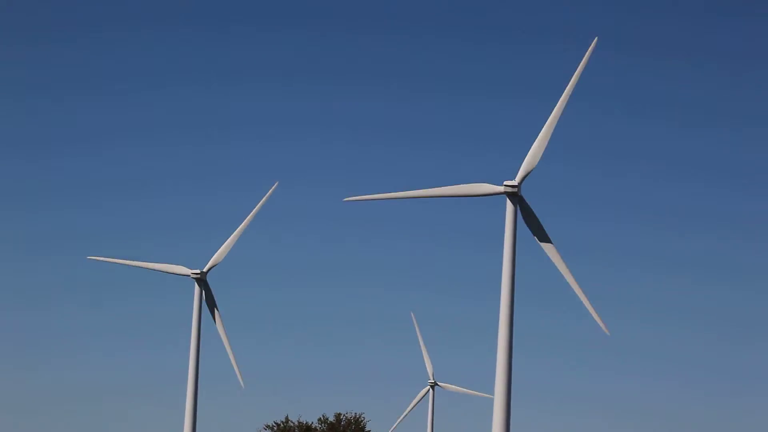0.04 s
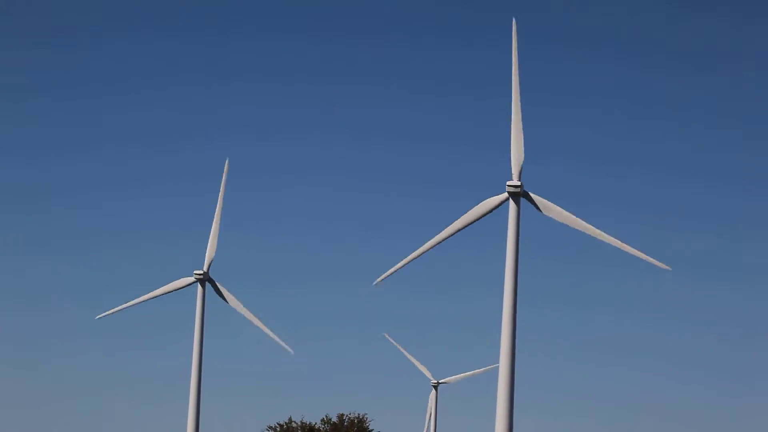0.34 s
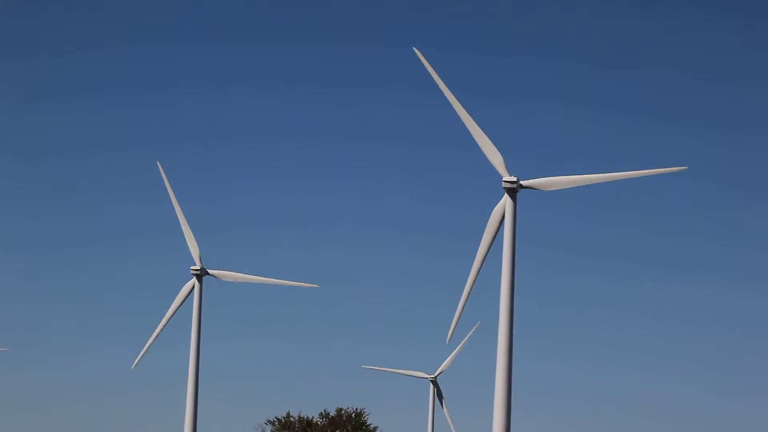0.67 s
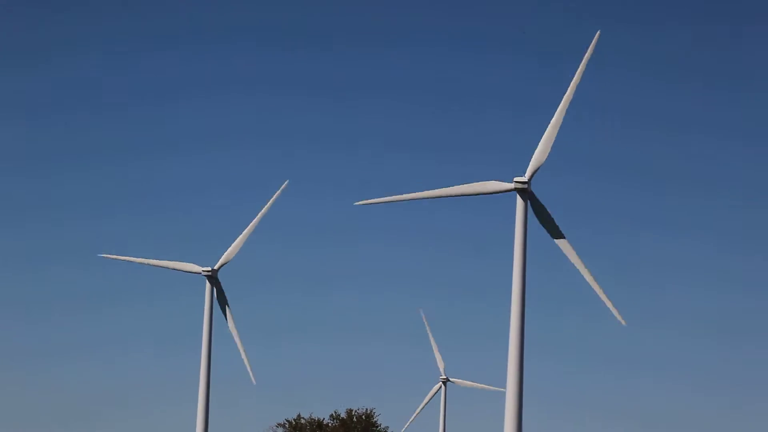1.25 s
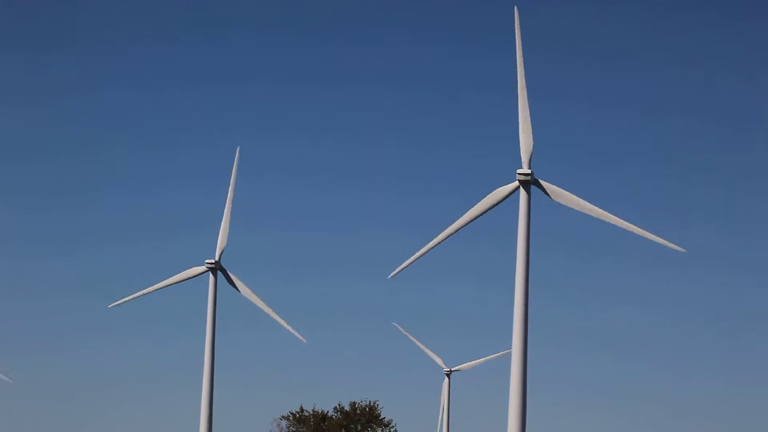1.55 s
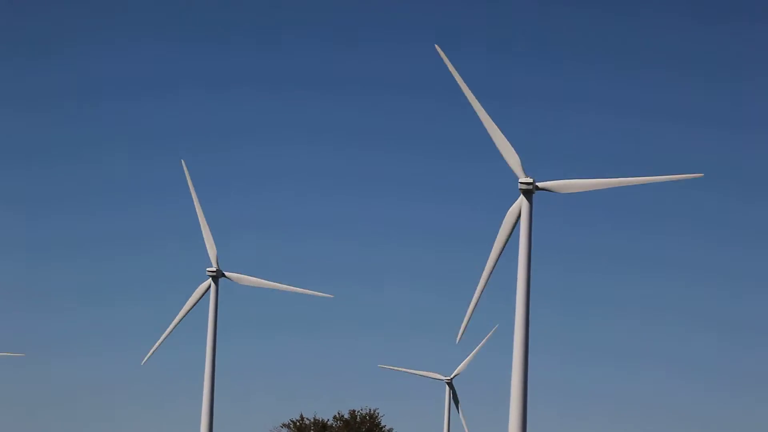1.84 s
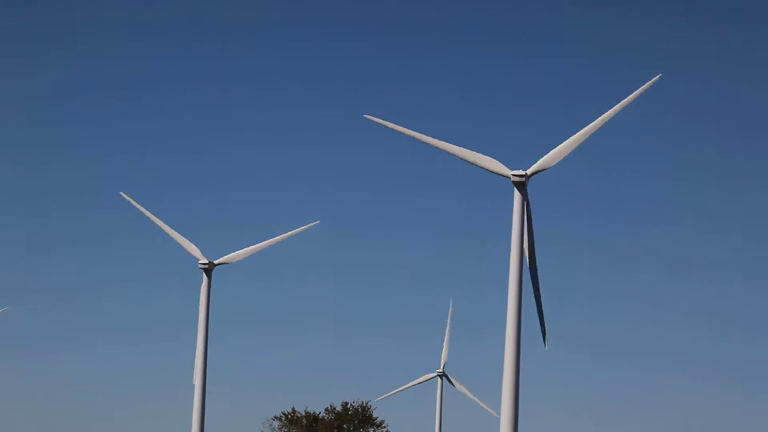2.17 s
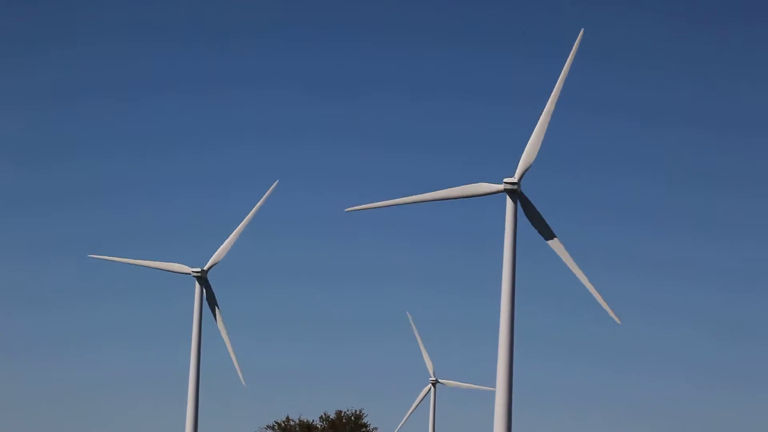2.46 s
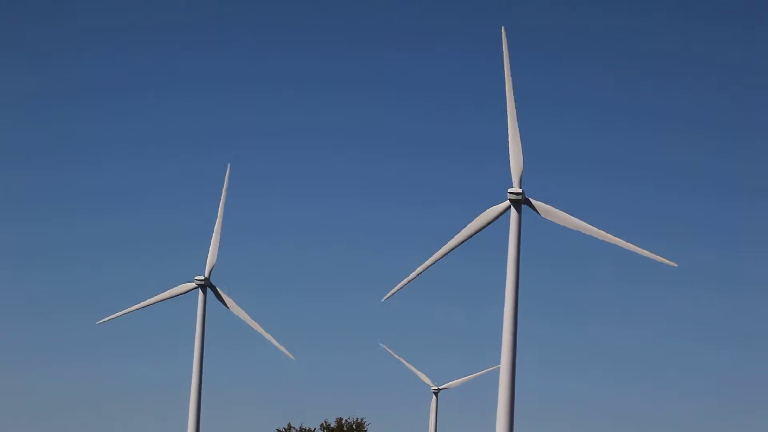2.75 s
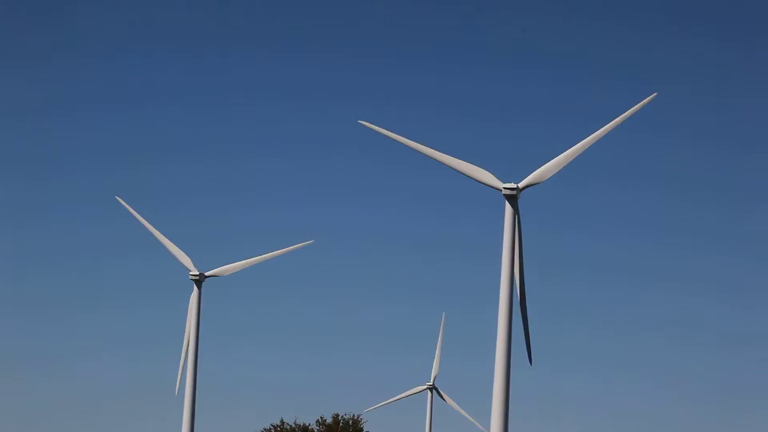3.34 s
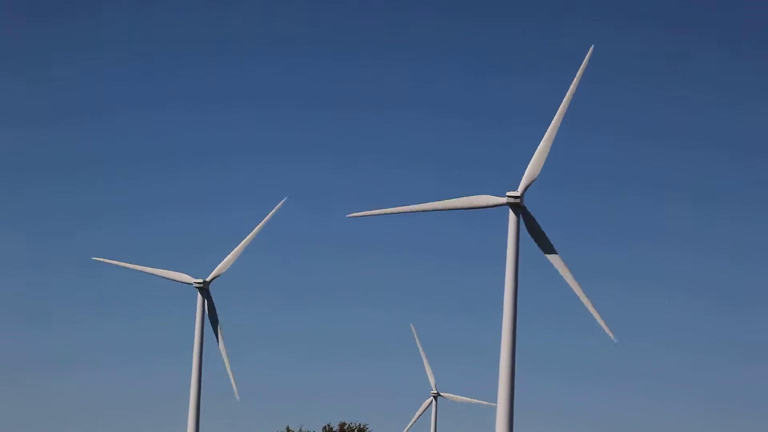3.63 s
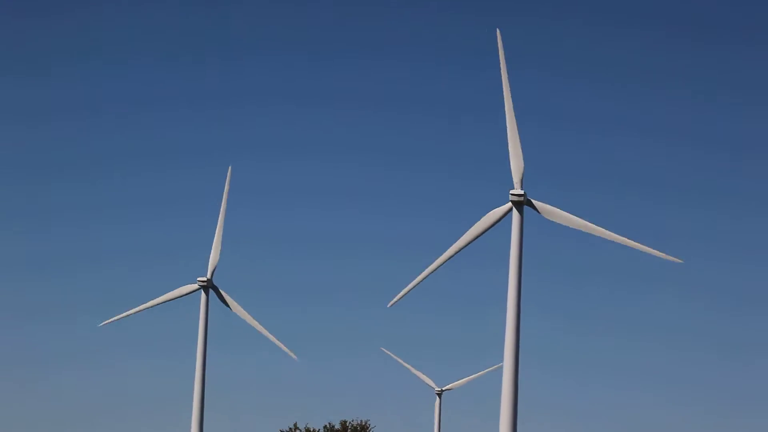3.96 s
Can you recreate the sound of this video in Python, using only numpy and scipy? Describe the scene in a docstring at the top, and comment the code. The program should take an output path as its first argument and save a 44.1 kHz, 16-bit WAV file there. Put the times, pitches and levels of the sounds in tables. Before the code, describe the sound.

Low, uneven wind rumble on a bare microphone, broken by brief knocks and ticks.

```python
"""A field of wind turbines, where gusty wind buffets a bare microphone.
Big eddies rumble and small ones flutter and fizz: bands of pressure noise, each riding its own level.
Low knocks, short pops and dry clicks sound during the gusts, each a single short pulse.
Three faint clanks, like metal some way off, ring over a thin hiss."""
import sys
import numpy as np
from scipy import signal
from scipy.fft import rfft, irfft
from scipy.io import wavfile
from scipy.ndimage import uniform_filter1d

SR = 44100
rng = np.random.default_rng(int(sys.argv[2]) if len(sys.argv) > 2 else 0)


def put_to_file(sound):
    """Save the sound as 16-bit audio at rate SR, in the file named by the first command-line argument."""
    columns = np.atleast_2d(sound).T  # one column per channel
    safe = np.clip(columns, -1, 1)
    whole_steps = np.round(safe * 32767)
    wavfile.write(sys.argv[1], SR, whole_steps.astype(np.int16))


N = 176400
T, HZ = np.arange(N) / SR, np.fft.rfftfreq(N, 1 / SR)


def amp(db):
    """Decibels to gain."""
    return 10 ** (np.asarray(db) / 20)


def unit(x):
    """Scales to rms 1."""
    return x / np.sqrt(np.mean(x ** 2) + 1e-20)


def at_hz(points, hz):
    """Reads a curve on a log-frequency axis."""
    f, value = np.transpose(points)
    return np.interp(np.log(hz + 1), np.log(f + 1), value)


def curve(points):
    """Reads an envelope at every sample."""
    return np.interp(T, *np.transpose(points))


def add(mix, start, sound):
    """Mixes a sound in at start seconds."""
    part = mix[max(round(start * SR), 0):][:len(sound)]
    part += sound[:len(part)]


def noise(spectrum):
    """Noise of the given colour, rms 1."""
    return unit(irfft(rfft(rng.standard_normal(N)) * amp(at_hz(spectrum, HZ)), N))


def even_noise(spectrum, samples):
    """Coloured noise, its power held even over about that many samples."""
    x = noise(spectrum)
    power = uniform_filter1d(uniform_filter1d(x ** 2, samples), samples)
    return x / np.sqrt(abs(power) + 1e-9)


def wander(rate_hz):
    """Smooth random motion up to about rate_hz, rms 1."""
    return unit(irfft(rfft(rng.standard_normal(N)) * np.exp(-(HZ / rate_hz) ** 2), N))


# rumble colour: f/Hz, level/dB
RUMBLE_EQ = [(25, -34.5), (50, -23.5), (65, 6.5), (100, 1.5), (135, 4.5), (175, -12), (300, -38),
             (600, -89)]
# rumble envelope: t/s, level/dB
RUMBLE_ENV = [(0.04, -17.5), (0.17, -16), (0.19, -34), (0.28, -24.5), (0.31, -38), (0.38, -24),
              (0.64, -20.5), (0.75, -28), (0.88, -19.5), (0.98, -24), (1.1, -16), (1.13, -24.5),
              (1.19, -21), (1.21, -18.5), (1.31, -12), (1.34, -20.5), (1.36, -17.5), (1.44, -32),
              (1.5, -14), (1.61, -13.5), (1.66, -27.5), (1.71, -9.5), (1.74, -34), (1.76, -13.5),
              (1.93, -28.5), (2.0, -11.5), (2.04, -22), (2.06, -7.5), (2.09, -25.5), (2.14, -29),
              (2.23, -13.5), (2.29, -21), (2.38, -17.5), (2.44, -25.5), (2.53, -11.5), (2.58, -38),
              (2.62, -12.5), (2.65, -30), (2.67, -8), (2.71, -24), (2.85, -12), (2.88, -22.5), (3.15, -14),
              (3.18, -19), (3.64, -20), (3.66, -17), (3.72, -23.5), (3.77, -17.5), (3.8, -30.5),
              (3.87, -12.5), (3.9, -26.5), (3.96, -26.5)]
def rumble():
    """Big eddies press on the microphone and give the wind its low end."""
    return even_noise(RUMBLE_EQ, samples=1400) * amp(curve(RUMBLE_ENV) + 0.5)


# buffet colour: f/Hz, level/dB
BUFFET_EQ = [(60, -36.5), (120, -3.5), (160, 0), (220, -1.5), (310, -8), (400, -13.5), (520, -25),
             (800, -52.5), (1500, -92)]
# buffet envelope: t/s, level/dB
BUFFET_ENV = [(0.02, -11.5), (0.17, -21.5), (0.2, -23.5), (0.24, -13), (0.33, -26.5), (0.35, -16.5),
              (0.38, -18.5), (0.42, -14), (0.54, -25), (0.57, -14), (0.59, -26), (0.65, -15.5), (0.77, -28),
              (0.81, -19.5), (0.93, -18.5), (0.97, -31.5), (1.07, -27.5), (1.1, -14), (1.15, -30.5),
              (1.18, -12), (1.21, -25), (1.24, -24), (1.31, -17.5), (1.37, -32), (1.44, -33), (1.53, -19),
              (1.61, -13.5), (1.67, -20.5), (1.69, -16), (1.75, -25.5), (1.87, -19.5), (1.92, -28),
              (2.03, -22.5), (2.06, -19.5), (2.12, -24), (2.2, -22), (2.46, -27), (2.57, -18),
              (2.71, -23.5), (3.12, -19), (3.15, -18.5), (3.16, -14.5), (3.19, -24), (3.46, -15.5),
              (3.48, -23.5), (3.61, -18), (3.71, -17), (3.84, -24.5), (3.87, -17.5), (3.92, -21),
              (3.95, -19), (3.98, -14.5)]
def buffet(eddies, shake_db=2.0):
    """Mid-sized eddies batter the microphone in the low mids."""
    return even_noise(BUFFET_EQ, samples=900) * amp(curve(BUFFET_ENV)) * unit(amp(shake_db * eddies))


# sway colour: f/Hz, level/dB
SWAY_EQ = [(10, -10.5), (25, -4), (40, 3), (58, -6), (75, -11), (130, -38), (400, -89.5)]
# sway envelope: t/s, level/dB
SWAY_ENV = [(0.03, -15), (0.34, -47), (0.4, -31.5), (1.09, -30), (1.32, -22), (1.39, -30), (1.58, -14.5),
            (1.78, -34), (1.84, -14.5), (1.96, -30.5), (2.31, -22), (2.38, -26), (2.74, -22), (2.79, -30.5),
            (3.11, -21), (3.16, -34.5), (3.62, -21), (3.96, -21)]
def sway():
    """The slowest pressure swings add sub-bass weight."""
    return noise(SWAY_EQ) * amp(curve(SWAY_ENV) - 1)


# colours of the flutter and of the fizz on top: f/Hz, level/dB
FLUTTER_EQ = [(200, -29), (350, -6), (460, 0.5), (620, -4.5), (800, -13), (1000, -20.5), (1400, -43),
              (2200, -58), (4000, -96)]
FIZZ_EQ = [(400, -28), (800, -1.5), (1200, -0.5), (1700, -11), (2400, -20), (3000, -33.5), (4500, -52.5)]
# flutter envelope, standing for air speed: t/s, level/dB
FLUTTER_ENV = [(0.01, -25.5), (0.1, -29.5), (0.13, -32), (0.29, -32), (0.3, -28), (0.33, -41), (0.43, -32),
               (0.5, -44), (0.67, -34), (0.68, -47), (0.81, -41.5), (0.83, -58), (0.85, -39.5),
               (0.92, -37.5), (0.95, -50), (1.07, -50), (1.1, -38.5), (1.13, -51), (1.2, -39.5),
               (1.24, -47), (1.27, -36.5), (1.38, -52), (1.5, -50), (1.56, -37.5), (1.76, -39.5),
               (1.77, -32), (1.79, -43), (1.87, -37), (2.0, -43), (2.02, -37.5), (2.15, -38), (2.35, -40.5),
               (2.38, -47.5), (2.55, -43.5), (2.59, -30.5), (2.65, -46), (2.67, -38), (2.75, -46),
               (2.91, -37.5), (3.05, -37), (3.1, -30.5), (3.14, -40.5), (3.17, -29.5), (3.2, -43),
               (3.26, -41), (3.27, -27), (3.3, -47), (3.42, -28), (3.49, -44), (3.64, -33.5), (3.66, -35),
               (3.69, -33.5), (3.7, -39.5), (3.73, -31), (3.77, -37), (3.86, -38.5), (3.9, -26.5),
               (3.93, -32.5), (3.95, -32), (3.98, -32)]
# fizz envelope with the flutter envelope at usual_db: t/s, level/dB
FIZZ_ENV = [(0, -60), (.45, -60), (.7, -66), (1.3, -59), (1.65, -62), (1.9, -57.5), (2.2, -55.5),
            (2.5, -58.5), (3.1, -57), (3.3, -62), (3.7, -58.5), (4, -61.5)]
def flutter(eddies, shake_db=2.5, fizz_shake_db=4.5, fizz_growth=1.1, usual_db=-37.5):
    """Small eddies flutter in the mids and brighten into fizz as the air speeds up."""
    speed_db = curve(FLUTTER_ENV)
    body = even_noise(FLUTTER_EQ, samples=600) * amp(speed_db + 2) * unit(amp(shake_db * eddies))
    fizz_db = curve(FIZZ_ENV) + fizz_growth * (speed_db - usual_db)
    fizz = noise(FIZZ_EQ) * amp(fizz_db) * unit(amp(fizz_shake_db * eddies))
    return body + fizz


def wind():
    """Eddies of all sizes; one shared quick unsteadiness shakes the smaller ones most."""
    eddies = wander(rate_hz=85)
    return sway() + rumble() + buffet(eddies) + flutter(eddies)


# hard eddies hitting the microphone: t/s, peak level/dB, half width/ms
KNOCK_HITS = [(1.3013, -5, 3), (1.3141, -5.5, 2.17), (1.567, 1, 1.54), (1.6102, -2.5, 2.3),
              (3.101, -9, 0.9), (3.148, -1.5, 1.5), (3.669, -2, 2.66)]
def knocks():
    """A hard eddy is one push with suction before and after."""
    out = np.zeros(N)
    for at, db, width_ms in KNOCK_HITS:
        widths = (T - at) * 1000 / width_ms
        out += amp(db) * (1 - widths ** 2) * np.exp(-widths ** 2 / 2)
    return out


# mid-pitched pops: t/s, peak level/dB, f/Hz
POP_HITS = [(.071, -42, 1700), (.080, -38.5, 1700), (.241, -39.5, 1400), (.662, -31, 650),
            (1.567, -22.5, 1000), (1.570, -35, 2000), (1.612, -36, 700), (2.018, -33, 713),
            (3.153, -37.5, 1500), (3.274, -48, 1950), (3.445, -41, 2000), (3.685, -31.5, 1300)]
def pops(half_width_cycles=0.7):
    """A small fast eddy bursts in a cycle or two."""
    out = np.zeros(N)
    for at, db, hz in POP_HITS:
        cycles = (T - at) * hz
        out += amp(db) * np.cos(2 * np.pi * cycles) * np.exp(-(cycles / half_width_cycles) ** 2)
    return out


# dry clicks during the gusts: t/s, peak level/dB, corner f/Hz
CLICK_HITS = [(.418, -41, 4010), (.535, -47, 3940), (.732, -44, 4000), (.838, -46, 4000),
              (1.567, -21, 1990), (1.578, -27.5, 3030), (1.6084, -27, 3200), (1.6122, -31.5, 3020),
              (1.704, -42, 4000), (1.763, -45, 4000), (1.981, -41, 4010), (3.108, -45, 4040),
              (3.153, -27.5, 3500), (3.361, -43, 3930), (3.481, -42.5, 3960)]
def clicks():
    """Dry ticks whose top end rolls off at 12 dB an octave above a corner."""
    out, hz = np.zeros(N), np.fft.rfftfreq(512, 1 / SR)
    for at, db, corner_hz in CLICK_HITS:
        tick = np.fft.fftshift(irfft(1 / (1 + (hz / corner_hz) ** 2)))
        add(out, at - len(tick) / 2 / SR, amp(db) * tick / tick.max())
    return out


# clank cues: t/s, level/dB
CLANK_HITS = [(1.342, -57), (2.158, -46), (2.974, -59)]
# colour of the dense ring: f/Hz, level/dB
RING_EQ = [(1000, -23), (1900, -7.5), (2600, 4.5), (3400, -3.5), (5200, -4), (7300, -3.5), (9000, -16.5),
           (14000, -31)]
# decay of the dense ring: f/Hz, t60/s
RING_DECAY = [(2000, .5), (3000, .3), (5500, .28), (7500, .15), (12000, .12)]
# clear modes of the metal: f/Hz, level/dB, t60/s
METAL_MODES = [(2003, -17, .9), (2627, -9, .42), (2725, -11, .35), (2864, -6, .28), (3607, -16, .16),
               (5196, -12, .22), (5766, -18, .3), (10200, -20, .12)]
def clanks(attack_s=0.011):
    """Metal struck some way off: a soft attack, a dense ring and a few clear modes."""
    out, t = np.zeros(N), T[:SR]
    attack = np.minimum(t / attack_s, 1)
    for at, db in CLANK_HITS:
        hz, age, bands = signal.stft(noise(RING_EQ)[:SR], SR, nperseg=256)
        decay = amp(-60 * age / at_hz(RING_DECAY, hz)[:, None])  # the highs die first
        ring = signal.istft(bands * decay, SR)[1][:SR]
        modes = sum(amp(level - 60 * t / t60) * np.sin(2 * np.pi * (f * t + rng.random()))
                    for f, level, t60 in METAL_MODES)
        add(out, at, amp(db) * attack * (ring + modes))
    return out


# hiss colour: f/Hz, level/dB
HISS_EQ = [(300, 6), (1000, 9), (2000, 9.5), (3000, 3), (5000, 1.5), (8000, -0.5), (12000, -1.5),
           (15800, -2.5)]
# hiss envelope: t/s, level/dB
HISS_ENV = [(0, -82), (.4, -73.5), (.75, -70), (1.05, -65), (1.56, -67), (1.62, -75.5), (2.1, -71.5),
            (2.45, -69.5), (3.1, -76), (3.17, -76.5), (3.55, -75), (4, -77.5)]
def hiss():
    """A thin bed of hiss that swells and sinks."""
    return noise(HISS_EQ) * amp(curve(HISS_ENV))


def scene():
    """Everything at the one microphone, in mono."""
    return (wind() + knocks() + pops() + clicks() + clanks() + hiss())[None]


def record(dry):
    """A soft clip rounds the tallest peaks at full scale; a steep high cut follows."""
    clipped = dry / (1 + dry ** 8) ** (1 / 8)
    high_cut = signal.firwin(511, cutoff=15830, window=("kaiser", 9), fs=SR)
    return signal.oaconvolve(clipped, high_cut[None], "same")


dry = scene()
out = record(dry)
put_to_file(out)
```